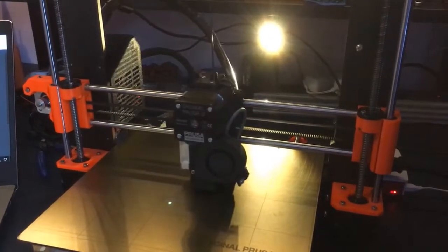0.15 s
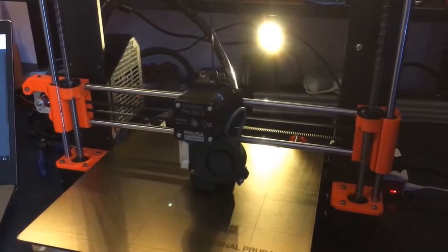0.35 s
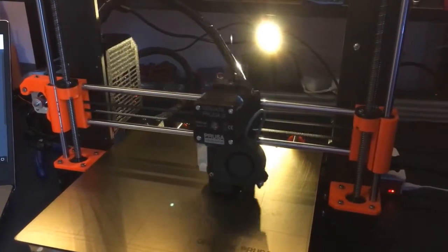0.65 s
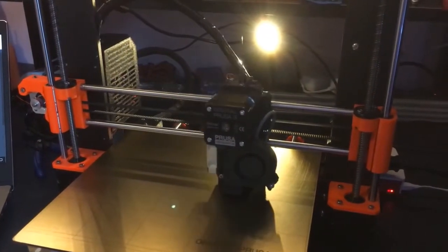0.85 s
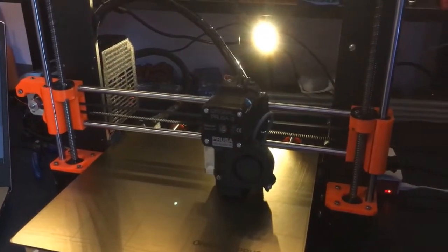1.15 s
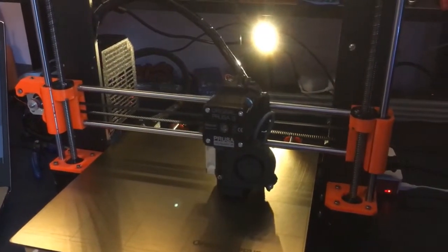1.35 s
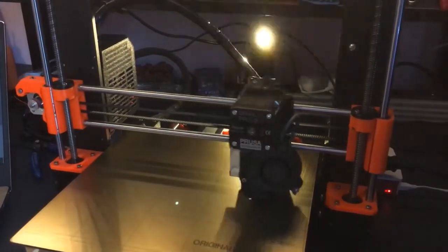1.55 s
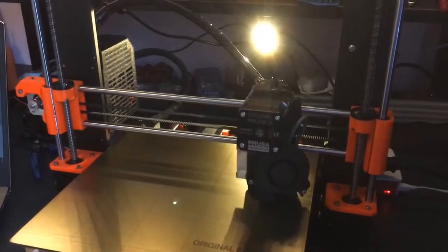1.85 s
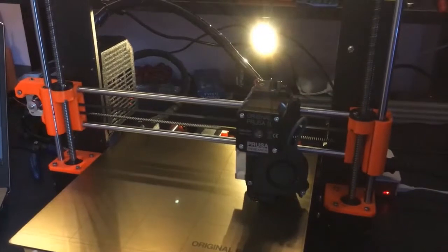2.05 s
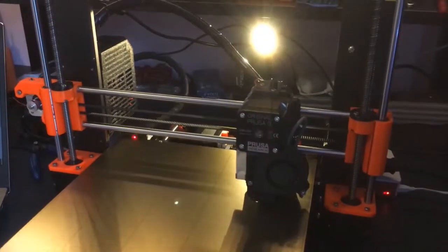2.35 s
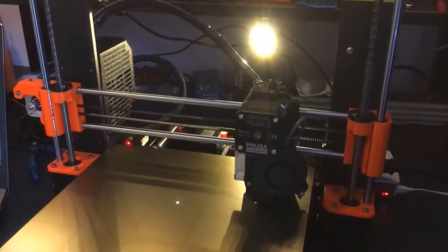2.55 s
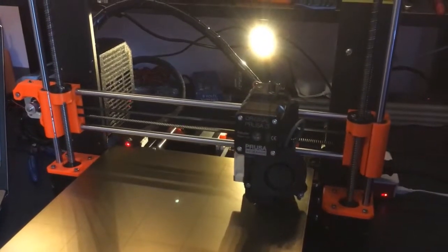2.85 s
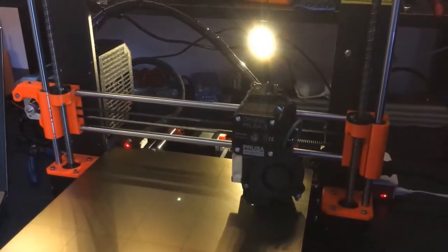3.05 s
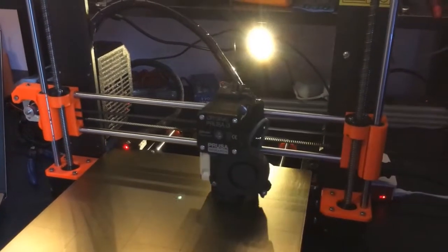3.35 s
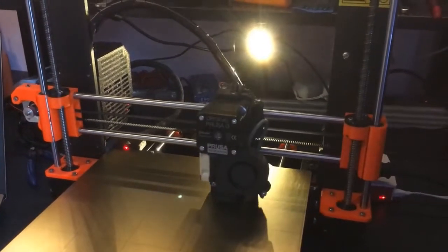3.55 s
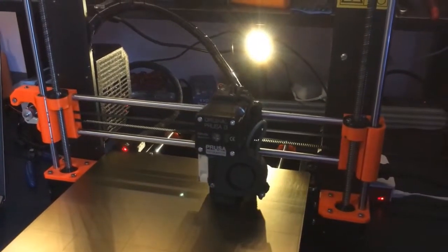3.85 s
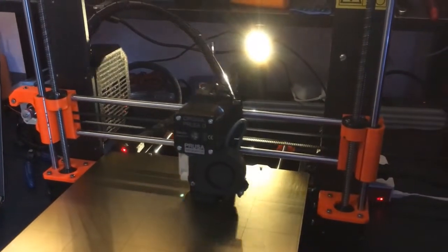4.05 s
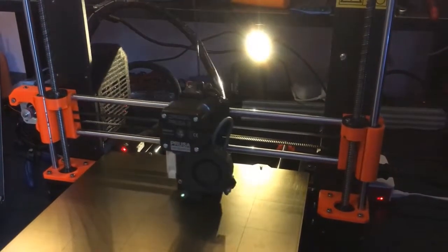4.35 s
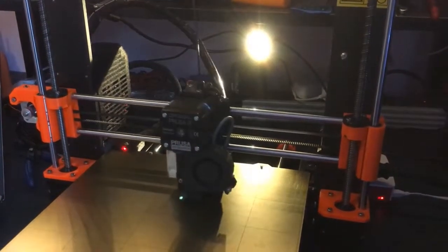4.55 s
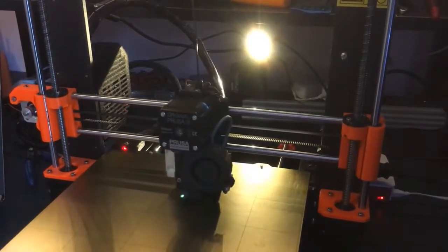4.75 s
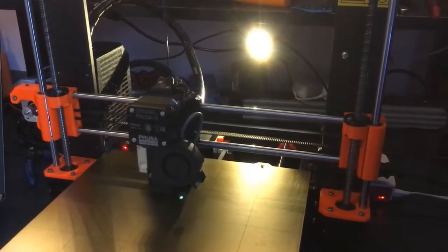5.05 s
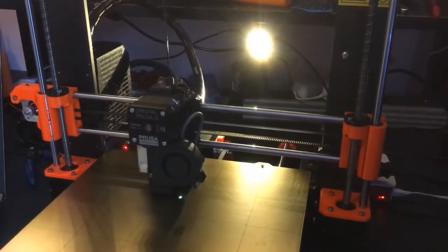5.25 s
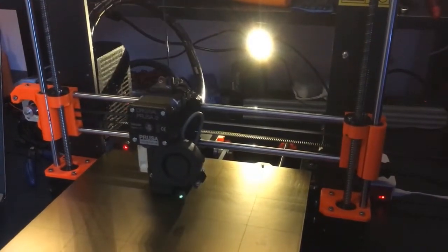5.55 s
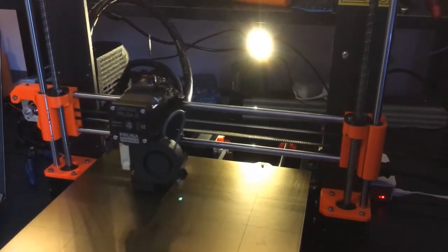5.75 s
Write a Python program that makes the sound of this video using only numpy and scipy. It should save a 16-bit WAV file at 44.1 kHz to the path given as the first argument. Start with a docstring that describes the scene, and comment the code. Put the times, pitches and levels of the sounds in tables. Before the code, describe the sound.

Heard from close by in a small dry space, a printer repeats a regular cycle: about half a second of rapid low thrums with soft belt rasps, then a third of a second of smooth whirring travel with a downward-sweeping hiss. Loose bearings buzz faintly now and then, the bed gives one rising and falling growl, and quiet fan air and thin driver hiss continue underneath.

```python
"""Desktop 3D printer filling small patches

Six quick zigzag strokes per patch shake the frame and table, then the head glides to the next patch.
The motors whine with their speed, the bed growls once, and the bearings rush along the rods and clack.
The motor drivers hiss high up, the hiss sweeping down as a motor speeds up.
A small fan runs throughout. Sines make the tones; shaped noise makes the rush, rattle and hiss."""
import sys
import numpy as np
from scipy import signal
from scipy.fft import rfft, irfft, next_fast_len
from scipy.io import wavfile
from scipy.ndimage import map_coordinates

SR = 44100
rng = np.random.default_rng(int(sys.argv[2]) if len(sys.argv) > 2 else 0)


def transcribe(u):
    """Save the signal u as a 16-bit wav file named by the first command-line argument.

    u: samples, shape (n,) or (channels, n), limited to [-1, 1]; the rate is SR.
    q: integer samples, one column per channel.
    """
    v = np.clip(np.atleast_2d(u).T, -1, 1)
    q = np.round(v * 32767).astype(np.int16)
    wavfile.write(sys.argv[1], SR, q)


N = 260278
T = np.arange(N) / SR  # time of every sample [s]
TOP_HZ = 15830  # upper band limit

# fan tones: (pitch [Hz], level [dB])
FAN_TONES = [(172, -56.5), (612, -80.5)]
# colour of the fan's rushing air: (frequency [Hz], level [dB])
FAN_AIR = [(130, 0), (220, 1.5), (324, -2), (372, -5), (445, -8), (512, -10), (675, -12), (713, -27),
           (764, -11), (1170, -20.5), (1310, -16), (1500, -16.5), (2010, -16.5), (4810, -31.5),
           (6000, -25.5), (7800, -35), (13200, -120)]
# colour of the motor drivers' holding hiss: (frequency [Hz], level [dB])
HOLDING_HISS = [(2650, -19), (4500, -20.5), (4790, -38), (5520, -27), (7300, -17.5), (7850, -25),
                (8630, -13), (10300, -13), (11900, -6), (12300, -4), (13900, -2.5), (15100, -2.5),
                (15800, 1)]
# spells when the hiss gathers in a band: (start [s], end [s], centre [Hz], width [Hz], level [dB])
HISS_BANDS = [(0, 0.568, 12430, 490, -58), (0, .56, 15200, 700, -57), (2.281, 2.331, 12200, 1900, -45.5),
              (2.316, 2.52, 12050, 1900, -53), (2.503, 2.551, 12200, 1900, -45.5),
              (5.149, 5.675, 13300, 598, -60), (5.141, 5.68, 15300, 1130, -54.5)]
# what the motor case lets out: (frequency [Hz], level [dB])
MOTOR_CASE = [(3000, -41), (7000, -48), (8500, -16.5), (10500, -8), (12500, 3), (13800, 0.5), (15000, 6.5),
              (16000, 9)]
# two brief high tones: (pitch [Hz], level [dB], time to fade by 60 dB [s])
HIGH_TONES = [(2121, -54, 0.26), (2990, -52, 0.2)]
HIGH_TONES_S = 1.775
# loose bearings buzzing: (start [s], length [s], level [dB])
BUZZES = [(0.717, 0.011, -51), (1.618, 0.02, -47), (1.755, 0.023, -47.5), (2.605, 0.032, -54),
          (4.169, 0.0065, -42.5)]
# colour of the bearing buzz: (frequency [Hz], level [dB])
BUZZ_COLOUR = [(900, -3.5), (1800, -2.5), (2400, 7.5), (2750, -10), (3000, 6), (3400, -8), (4300, 0.5),
               (5000, -15), (6000, 0.5), (6700, -1), (7800, -19), (11000, -11), (15000, -50)]
# sharp clacks of the carriage: (time [s], level [dB])
CLACKS = [(3.3671, -27)]
# ringing of the carriage's steel: (pitch [Hz], level [dB], time to fade by 60 dB [s])
CARRIAGE_MODES = [(1374, -24, 0.1), (2422, -11, 0.032), (3340, -9.5, 0.025), (4190, -16, .06),
                  (4730, -6, 0.015), (4920, -1, 0.014), (6477, -8, 0.016), (6700, -7, .016),
                  (7230, -8, .018), (9400, -8.5, .015)]
# the bed's one long move: (time [s], step rate [Hz])
BED_MOVE = [(2.272, 1), (2.395, 570), (2.42, 624), (2.45, 576.5), (2.49, 400.5), (2.53, 282.5), (2.62, 92),
            (2.63, 4)]
# tones ringing in the bed: (start [s], end [s], pitch [Hz], level [dB])
BED_RINGS = [(2.31, 2.37, 920, -69), (2.325, 2.43, 672, -48.5), (2.38, 2.405, 672, -45.5),
             (2.365, 2.46, 935, -53.5), (2.505, 2.6, 598, -56.5)]
# dull knocks of the bed plate: (time [s], level [dB])
BED_KNOCKS = [(0.066, -48), (.091, -55.5), (1.776, -56)]
# resonances of the bed plate: (centre [Hz], width [Hz], level [dB])
BED_PLATE = [(606, 79, 1), (658, 25, 9.5), (704, 93, -4), (1010, 100, -6), (1290, 270, -9)]
# low resonances of the table: (centre [Hz], width [Hz], level [dB])
TABLE_MODES = [(62, 4, -10), (77.7, 6.3, -13), (116.3, 10.04, 0), (171.4, 12.55, 0), (198, 17.9, -9.5),
               (227.3, 23.4, -13)]
# carriage resonances that colour the belt's rasp: (centre [Hz], width [Hz], level [dB])
BELT_MODES = [(706, 190, -2.5), (1333, 74, 3), (1630, 79, -4.5), (1980, 92, -4.5), (2900, 490, -17),
              (6460, 1000, -20)]
# glides of the head: (start [s], length [s], top step rate [Hz], whine [dB], bearings [dB],
# driver hiss [dB], belt drone [dB], table rumble [dB])
GLIDES = [(0.52, 0.37, 460, -67.5, -54.5, -50.5, -49, -46),
          (1.379, 0.37, 463.6, -77, -54.5, -51, -45.5, -45),
          (2.237, 0.37, 445.3, -84, -56.5, -49.5, -51, -51.5),
          (3.103, 0.37, 465.7, -66.5, -54.5, -51, -43.5, -45.5),
          (3.95, 0.36, 473, -63.5, -53.5, -50, -47.5, -48.5),
          (4.798, 0.37, 464, -59.5, -55, -50.5, -55, -47), (5.65, 0.35, 468.7, -62.5, -55, -50, -48.5, -52)]
# ringing of the head motor's mount: (centre [Hz], width [Hz], level [dB])
MOTOR_MOUNT = [(463, 14, 7.5), (928, 20, -3.5), (1874, 19, 6.5)]
# resonances of the gantry that carries the head: (centre [Hz], width [Hz], level [dB])
GANTRY_MODES = [(125, 21, -1.5), (177, 18, 4), (207, 31, -5), (248, 26, -5)]
# colour of bearings rolling on the rods: (frequency [Hz], level [dB])
ROLLING_COLOUR = [(180, -44), (300, 6), (354, -24), (471, -6), (524, -8), (929, -6), (1110, -15),
                  (1310, -6.5), (1750, -6.5), (1830, -16), (2000, -8.5), (2920, -6), (4950, -13),
                  (6300, -8.5), (11000, -13), (14300, -7), (22000, -120)]
# zigzag patches: (first reversal [s], swing level [dB], swing length [s], swing pitch [Hz],
# extra level of the first swing [dB], sway [dB], belt tick [dB], table rumble [dB], holding hiss [dB])
PATCHES = [(.065, -30, 0.034, 118, 2.5, -39.5, -52.5, -46, -51.5),
           (.913, -27, 0.055, 117, -1, -42.5, -50.5, -50, -55),
           (1.786, -28, 0.058, 118.6, 3, -43, -50, -49.5, -55),
           (2.619, -29.5, 0.049, 116.8, 2, -46.5, -51, -47, -54),
           (3.476, -29.5, .035, 113.5, -6, -42, -53.5, -45.5, -54),
           (4.329, -29, 0.025, 114, -5, -38.5, -56.5, -47.5, -53.5),
           (5.187, -29.5, .04, 111, -2, -39.5, -55, -49, -55.5)]
STROKE_S, STROKE_COUNT = 0.0843, 6  # seconds from one reversal to the next; reversals in a patch
SWING_LAG_S, LAG_PER_LENGTH = 0.017, 0.31  # a swing peaks after its reversal, a long one later
LAST_SWING_DB, LAST_TICK_DB = -1.5, -8.5  # the last stroke of a patch is gentler
# single jolts of the frame: (middle [s], length [s], level [dB], pitch at the middle [Hz])
JOLTS = [(0.055, 0.017, -28.5, 116), (0.896, 0.014, -28, 126), (1.762, .024, -29.5, 121),
         (3.485, 0.016, -29, 117), (4.148, 0.04, -34.5, 120.9), (4.326, 0.019, -38, 114),
         (5.042, 0.12, -35.5, 118.5)]
# brief dips of the treble: (time [s], depth [dB])
TREBLE_DIPS = [(0.465, -11.5), (1.212, -13), (1.34, -16), (1.81, -10.5), (3.494, -21), (3.984, -12),
               (5.01, -6), (5.097, -11), (5.289, -11.5), (5.544, -11)]


def amp(db):
    """Turn decibels into a gain."""
    return 10 ** (np.asarray(db) / 20)


def unit(x):
    """Scale a sound to an average (rms) strength of 1."""
    return x / np.sqrt(np.mean(x ** 2) + 1e-20)


def wobble(rate):
    """A smooth random curve with this many random points a second."""
    points = rng.standard_normal(int(N * rate / SR) + 4)
    return map_coordinates(points, [T * rate])


def filtered(x, response):
    """Multiply the spectrum of x by a response that depends on frequency."""
    size = next_fast_len(N + SR // 2)
    spectrum = rfft(x, size) * response(np.fft.rfftfreq(size, 1 / SR))
    return irfft(spectrum, size)[:N]


def colour(points):
    """A response drawn through (frequency, dB) points on a log frequency axis."""
    f, db = np.transpose(points)
    return lambda hz: amp(np.interp(np.log(hz + 1), np.log(f), db, left=-120))


def body(modes):
    """Response of a solid object: a sum of resonances with alternating signs."""
    def response(f):
        total = 0
        for k, (centre, width, db) in enumerate(modes):
            peak = 1j * f * width / (centre * centre - f * f + 1j * f * width)
            total = total + (-1) ** k * amp(db) * peak
        return total
    return response


def noise(response):
    """Random noise of rms 1, shaped by the response."""
    return unit(filtered(rng.standard_normal(N), response))


def gate(start, end, edge):
    """Rise after the start, stay at 1 and fall after the end; each edge lasts edge seconds."""
    return np.clip((T - start) / edge, 0, 1) * np.clip((end - T) / edge + 1, 0, 1)


def cycle(hz):
    """Add up a changing frequency into a running phase."""
    return 2 * np.pi * np.cumsum(hz) / SR


def echoes(x, wet_db=-3, t60=0.098):
    """Close reflections: a dense random tail that fades by 60 dB in t60 seconds."""
    t = np.arange(SR // 5) / SR
    tail = rng.standard_normal(len(t)) * amp(-60 * t / t60)
    reflected = signal.fftconvolve(x, tail / np.linalg.norm(tail))[:N]
    return (x + amp(wet_db) * reflected) / np.hypot(1, amp(wet_db))


def reversals(first):
    """Times at which the head turns round in one patch."""
    return first + STROKE_S * np.arange(STROKE_COUNT)


def fan(air_db=-63):
    """Air rushes past the blades as noise, with slightly unsteady tones."""
    tones = np.zeros(N)
    for hz, db in FAN_TONES:
        level = amp(db + 3.8 * wobble(8)) * np.sqrt(2)
        tones += level * np.sin(cycle(hz * (1 + 0.0049 * wobble(9.9))))
    return tones + amp(air_db + 3.3 * wobble(24.93)) * noise(colour(FAN_AIR))


def drivers(bed_moving_db=-9):
    """Chopped holding current hisses in the motor coils, at times in bands; less while the bed moves."""
    patch_middles = [p[0] + STROKE_S * STROKE_COUNT / 2 for p in PATCHES]
    hold_db = np.interp(T, patch_middles, [p[-1] for p in PATCHES])
    bed_hz = np.interp(T, *np.transpose(BED_MOVE))
    out = amp(hold_db + bed_moving_db * bed_hz / bed_hz.max()) * noise(colour(HOLDING_HISS))
    for start, end, hz, width_hz, db in HISS_BANDS:
        band = noise(lambda f: 1 / (1 + (2 * (f - hz) / width_hz) ** 2))
        out += amp(db) * gate(start, end, 0.0035) * band
    return out


def high_tones():
    """Two brief high tones that fade away, made of sines."""
    t = np.maximum(T - HIGH_TONES_S, 0)
    return sum(amp(db - 60 * t / t60) * np.sin(2 * np.pi * hz * t) for hz, db, t60 in HIGH_TONES)


def carriage(buzz_hz=118, crack_db=-12, crack_t60=0.017, tail_db=-18, tail_t60=0.22):
    """Loose bearings chatter at the frame's pitch; a hard knock rings the carriage."""
    chatter = 0.26 + (0.5 + 0.5 * np.sin(2 * np.pi * buzz_hz * T)) ** 3
    level = sum(amp(db) * gate(s, s + length, 0.0067) for s, length, db in BUZZES)
    out = echoes(level * chatter * noise(colour(BUZZ_COLOUR)), wet_db=0.5, t60=0.24)
    for s, db in CLACKS:
        t = np.maximum(T - s, 0)
        # the steel rings briefly; the plastic parts rustle on
        ring = sum(amp(mode_db - 60 * t / t60) * np.sin(2 * np.pi * hz * t)
                   for hz, mode_db, t60 in CARRIAGE_MODES)
        crack = amp(crack_db - 60 * t / crack_t60) + amp(tail_db - 60 * t / tail_t60)
        bright = noise(colour([(900, -5), (2300, -4), (4600, 2), (7000, -3), (10000, -10), (15000, -24)]))
        out += amp(db) * (1 - np.exp(-t / 0.0002)) * (ring + crack * bright)
    return out


def bed(motor_db=-54, overtone_db=-7, rattle_db=-51, plate_db=-52, knock_t60=0.13):
    """The bed's motor rises and falls in pitch once, and the big plate rattles and rings."""
    step_hz = np.interp(T, *np.transpose(BED_MOVE))
    moving = gate(BED_MOVE[0][0], BED_MOVE[-1][0], 0.01)
    speed = np.clip(step_hz / step_hz.max(), 0, 1) * moving
    # the heavy bed shudders on its belt, which roughens the tone
    step = cycle(step_hz) + 1.0 * wobble(160)
    tone = speed ** 0.091 * np.sin(step) + amp(overtone_db) * speed ** 2 * np.sin(2 * step)
    motor = amp(motor_db + 6.1 * wobble(90)) * tone
    rattle_colour = colour([(60, -8), (120, -20), (230, 3.5), (400, -24), (600, 4.5), (800, -13),
                            (1200, -11), (1700, -11.5), (3500, -21.0), (7000, -38)])
    rattle = amp(rattle_db) * speed * noise(rattle_colour)
    rings = sum(amp(db + wobble(54)) * gate(start, end, 0.013) * np.sin(2 * np.pi * hz * T)
                for start, end, hz, db in BED_RINGS)
    knocks = sum(amp(db - 60 * np.maximum(T - s, 0) / knock_t60) * (T > s) for s, db in BED_KNOCKS)
    plate = (knocks + amp(plate_db) * speed ** 3) * noise(body(BED_PLATE))
    return motor + rattle + rings + plate


def table(landing_db=-42, landing_width=0.058):
    """The table's low resonances rumble under strokes and glides, and as the head lands on a patch."""
    power = sum(amp(db) ** 2 * gate(start, start + length, 0.055) for start, length, *_, db in GLIDES)
    for first, *_, rumble_db, _ in PATCHES:
        power += amp(rumble_db) ** 2 * gate(first, reversals(first)[-1], 0.021)
        power += amp(landing_db) ** 2 * np.exp(-((T - first + landing_width / 2) / landing_width) ** 2)
    skirt = colour([(20, -9), (45, -23), (60, 2), (230, -10), (330, -4), (600, -0.5), (2000, -74)])
    return np.sqrt(power) * noise(lambda hz: body(TABLE_MODES)(hz) * skirt(hz))


def sway(sway_hz=69, lag=0.036, width=0.019):
    """The table rocks under each stroke, at a lower pitch than the frame."""
    out = np.zeros(N)
    t = np.arange(-SR // 10, SR // 10) / SR
    for first, _, _, _, _, db, *_ in PATCHES:
        for s in reversals(first):
            swell = amp(db) * np.exp(-(t / width) ** 2)
            rock = swell * np.sin(2 * np.pi * (sway_hz * t + rng.random()))
            out += np.interp(T, s + lag + t, rock, left=0, right=0)
    return out


def belt(rise=0.0035, t60=0.069, level_db=-3.5, lead=0.0017, rub_db=-20, scatter_db=0.5):
    """The belt rubs softly through a patch and rasps each time it takes up the load."""
    envelope = np.zeros(N)
    for first, *_, tick_db, _, _ in PATCHES:
        envelope += amp(tick_db + rub_db) * gate(first - STROKE_S / 2, reversals(first)[-1], 0.011)
        extra = np.r_[np.zeros(STROKE_COUNT - 1), LAST_TICK_DB]
        extra = extra + scatter_db * rng.standard_normal(STROKE_COUNT)
        for s, extra_db in zip(reversals(first), extra):
            near = abs(T - s) < 0.2
            t = np.maximum(T[near] - s + lead, 0)
            fade = amp(tick_db + extra_db + level_db - 60 * t / t60)
            envelope[near] += fade * (1 - np.exp(-t / rise))
    return envelope * noise(lambda hz: body(BELT_MODES)(hz) / (1 + (hz / 7000) ** 4))


def glides(ramp=0.145, chopper_hz=19700, spread_hz=1100, bearing_power=1.22, tooth=0.3, whine_power=4,
           zip_db=-54):
    """Each glide speeds up evenly, cruises and brakes; its sounds follow its speed."""
    speed, step_hz, whine, bearing, driver, drone = np.zeros((6, N))
    for start, length, top_hz, whine_db, bearing_db, driver_db, drone_db, _ in GLIDES:
        v = np.clip(np.minimum(T - start, start + length - T) / ramp, 0, 1)
        speed += v
        step_hz += top_hz * v
        whine += amp(whine_db) * v ** whine_power
        bearing += amp(bearing_db) * v ** bearing_power
        driver += amp(driver_db) * np.clip((v - 0.06) / 0.23, 0, 1)
        drone += amp(drone_db) * np.sqrt(v)
    step = cycle(step_hz * (1 + 0.0033 * wobble(60)))
    # uneven motor force at the step rate and its octaves rings the motor mount
    ripple = sum(amp(0.81 * wobble(30)) * np.sin(2 ** k * step) for k in range(3))
    tones = filtered(whine * ripple, body(MOTOR_MOUNT))
    # steps, coil currents and belt teeth sweep through the gantry's resonances
    pushes = sum(np.sin(step / 2 ** k + 0.42 * wobble(60)) for k in range(4)) * amp(0.51 * wobble(40))
    hum = filtered(drone * pushes, lambda hz: body(GANTRY_MODES)(hz) + amp(-17) / (1 + (hz / 310) ** 8))
    # the sixteen microsteps of each step sweep through a resonance of the motor
    microsteps = np.sin(2 ** 4 * step + 1.05 * wobble(700)) * speed ** 2
    zip_tone = amp(zip_db) * filtered(microsteps, body([(6240, 710, 0)]))
    # balls roll along the rods, pulsing with the belt teeth
    tooth_pulse = 1 + tooth * np.sin(step / 2 ** 2)
    rolling = bearing * noise(colour(ROLLING_COLOUR)) * amp(2.7 * wobble(70)) * tooth_pulse
    # the unsteady current chopper has side tones that move down as the steps get faster
    sidebands = np.zeros(N)
    for k, db in [(2 ** 5, 5), (2 ** 4, -8)]:
        sidebands += amp(db) * np.sin(cycle(chopper_hz - k * step_hz + spread_hz * wobble(2500)))
    steady = noise(lambda hz: colour(MOTOR_CASE)(hz) * (hz < TOP_HZ))
    hiss = driver * (filtered(sidebands, colour(MOTOR_CASE)) + amp(-0.5) * steady)
    return tones + hum + echoes(zip_tone + rolling + hiss)


def swing(middle, length, db, hz, ring_hz=118, chirp=0.11, attack_power=5, release_power=2.05,
          ring_db=-17, ring_t60=0.43):
    """A jerk sets the frame swinging for a few cycles; it rings on at its own pitch."""
    out = np.zeros(N)
    near = abs(T - middle) < 0.25
    t = T[near] - middle
    power = np.where(t < 0, attack_power, release_power)
    swell = np.exp(-0.6 * abs(2 * t / length) ** power)
    tail = amp(ring_db - 60 * np.maximum(t, 0) / ring_t60) * np.clip(t / length + 0.5, 0, 1)
    ring = 2 * np.pi * ring_hz * T[near]
    # the driven swing slides upward throughout and passes pitch hz at its middle
    drive = 2 * np.pi * ((hz - ring_hz) * t + chirp * hz * t * t / (2 * length))
    out[near] = amp(db) * (swell * np.sin(ring + drive) + (1 - swell) * tail * np.sin(ring))
    return out


def frame():
    """The frame swings after every reversal, and now and then in a single jolt."""
    out = sum(swing(*jolt) for jolt in JOLTS)
    for first, db, length, hz, first_db, *_ in PATCHES:
        accents = np.r_[first_db, np.zeros(STROKE_COUNT - 2), LAST_SWING_DB]
        lag = SWING_LAG_S + LAG_PER_LENGTH * length
        for s, extra_db in zip(reversals(first), accents):
            out += swing(s + lag, length, db + extra_db, hz)
    return filtered(out, lambda hz: 1 / (1 + (hz / 230) ** 8))


def scene():
    """Add up the whole printer, heard from close by."""
    background = fan() + echoes(drivers())
    parts = high_tones() + carriage() + bed() + table() + sway()
    head = belt() + glides() + frame()
    return (background + parts + head)[None]


def record(dry, dip_length=0.018):
    """The treble dips briefly now and then; nothing is kept above the band limit."""
    dip_db = sum(db * np.exp(-(2 * (T - s) / dip_length) ** 4) for s, db in TREBLE_DIPS)
    treble = filtered(dry[0], lambda hz: 1 - 1 / (1 + (hz / 1100) ** 6))
    return filtered(dry[0] + (amp(dip_db) - 1) * treble, lambda hz: hz < TOP_HZ)[None]


dry = scene()
out = record(dry)
transcribe(out)
```